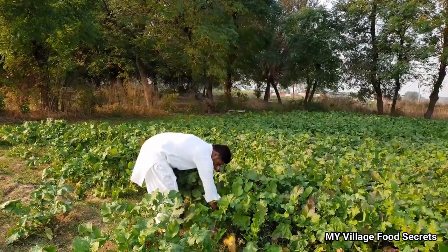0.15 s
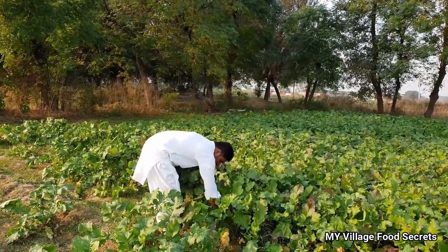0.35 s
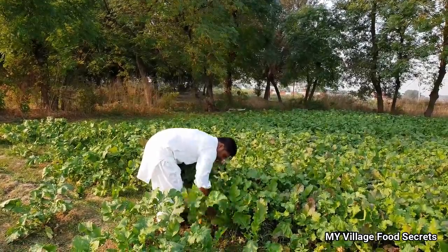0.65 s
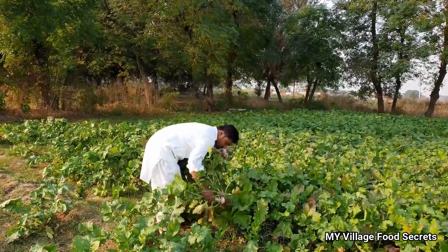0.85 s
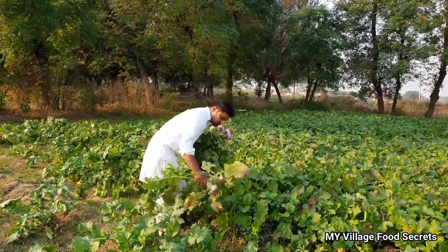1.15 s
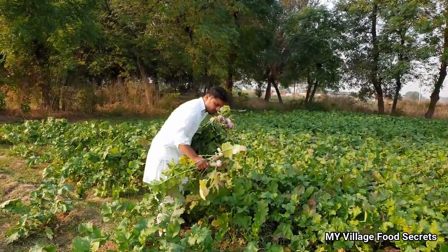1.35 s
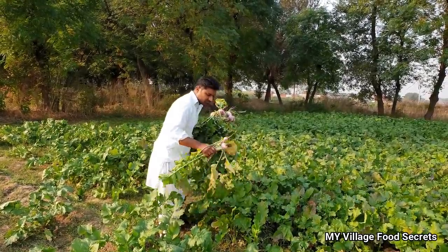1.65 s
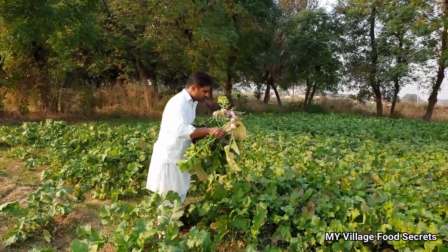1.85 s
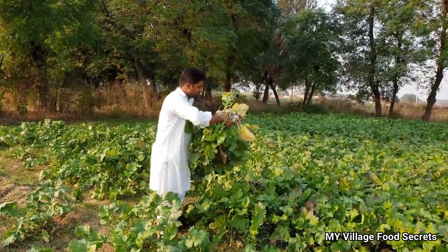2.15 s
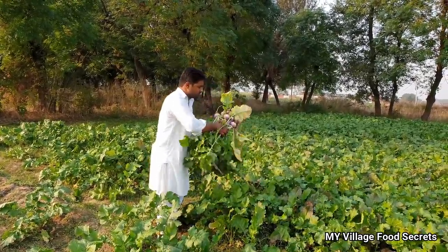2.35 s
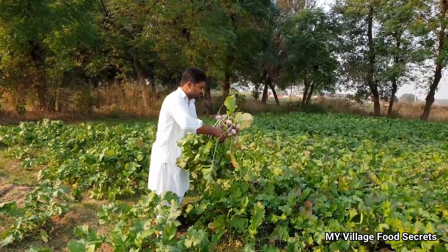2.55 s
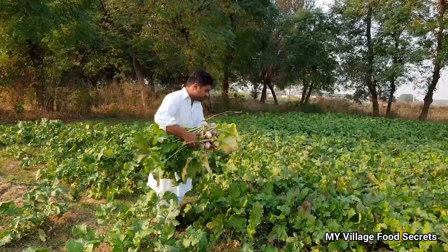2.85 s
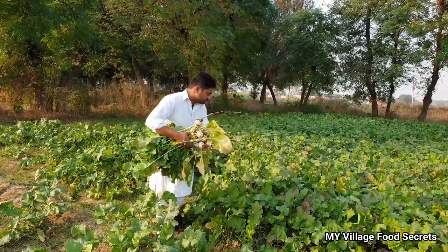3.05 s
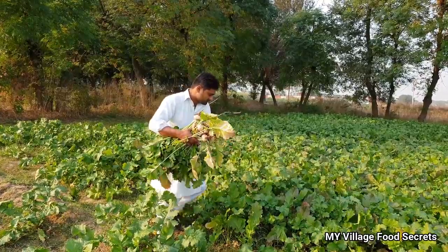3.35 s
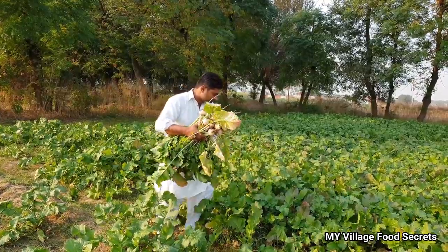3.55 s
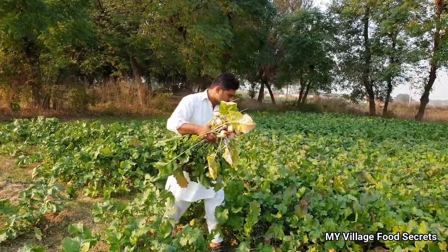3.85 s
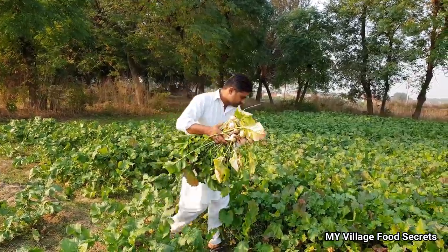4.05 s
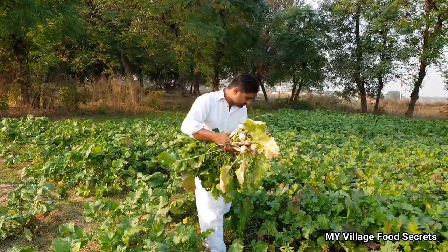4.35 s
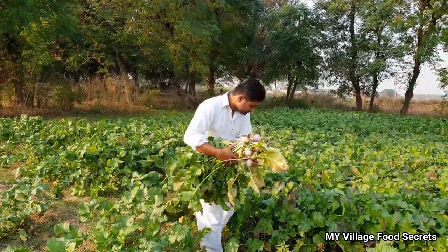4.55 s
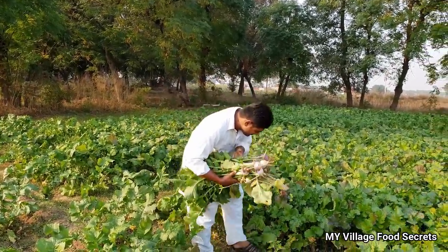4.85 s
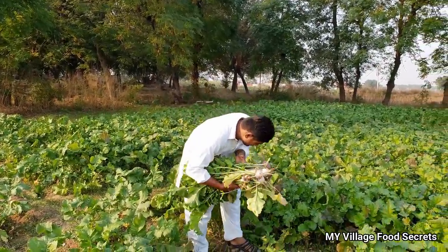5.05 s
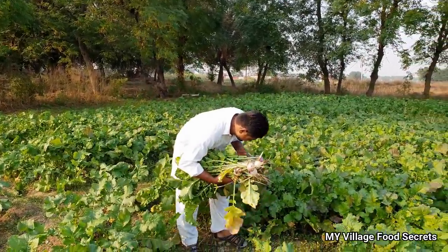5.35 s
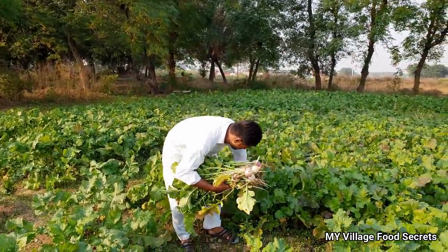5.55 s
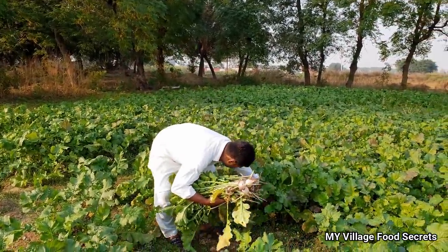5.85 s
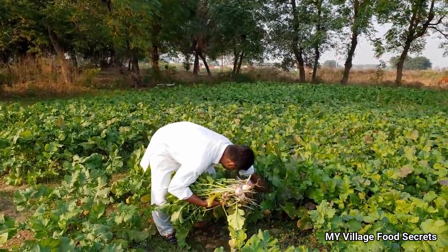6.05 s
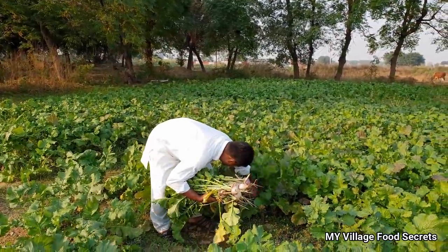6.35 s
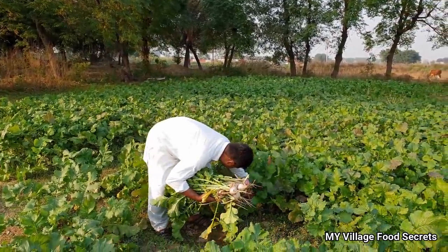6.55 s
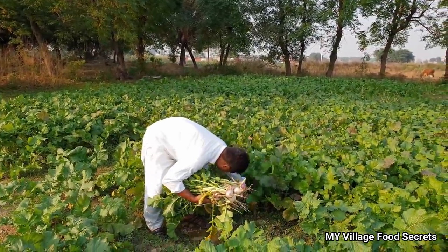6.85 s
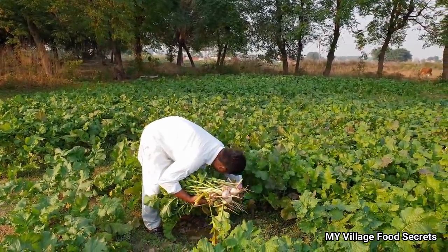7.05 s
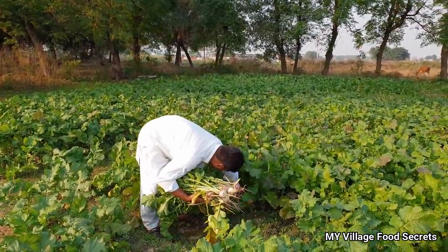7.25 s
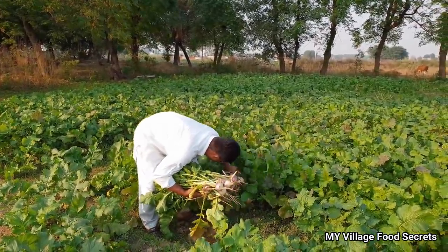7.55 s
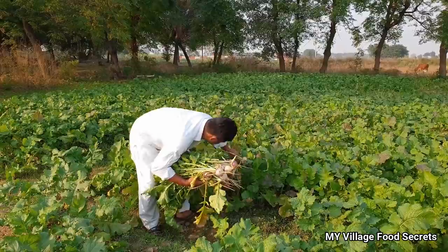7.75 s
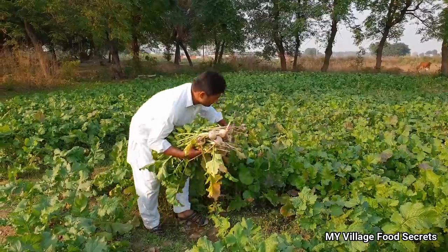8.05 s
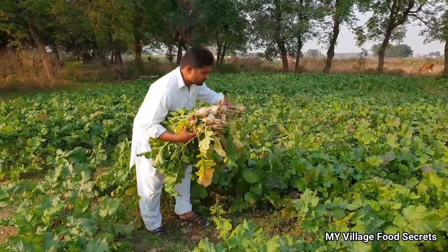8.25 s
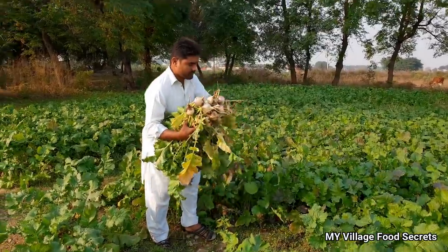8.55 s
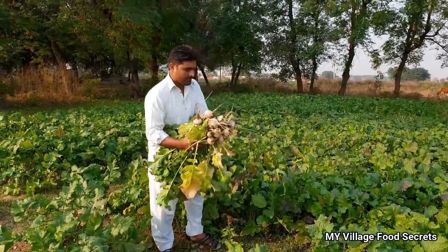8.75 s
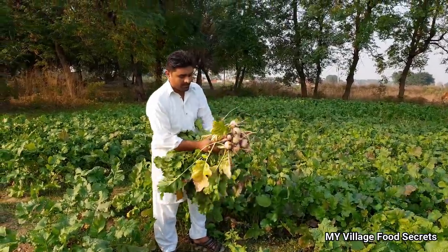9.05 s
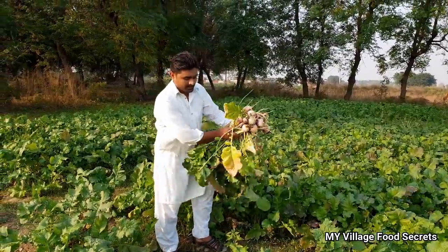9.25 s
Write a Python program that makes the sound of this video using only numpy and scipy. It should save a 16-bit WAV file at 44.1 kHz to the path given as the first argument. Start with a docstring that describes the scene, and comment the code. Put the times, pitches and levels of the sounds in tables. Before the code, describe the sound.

In an open field, wet leaves swish and crackle close by as turnips are pulled. A sharp stalk snap comes at 0.2 seconds, followed by strong rustling, short squeaks, more snaps and roots tearing from soil until about 1.3. Another pull comes around 2.2, then the handling softens. Rustling and snapping return from 4.3 to 5, from 6.8 to 8, and from 8.6 to the end at 9.4.

A small bird sings from 5.5 to 7 seconds: harsh chatter, a quick trill and four falling whistles, with a short echo from the trees.

Far away a diesel engine clatters, changing speed, then slows and fades after 7.5. A low pump hum wavers throughout, strongest at the start. A faint distant whine rises between about 2.5 and 3.7. Insects hiss faintly, and a light breeze adds a deep rumble on the microphones.

```python
"""Pulling turnips in a field

A man pulls turnips: wet leaves swish and crackle, stalks squeak and snap, roots tear out of the soil.
A small bird sings one phrase of chatter, a trill and falling whistles, echoed by the trees.
Far off a diesel engine clatters and changes speed, over the low hum of a pump and a brief whine.
Insects hiss faintly, and a light breeze presses on the microphones."""
import sys
import numpy as np
from scipy import signal
from scipy.fft import rfft, irfft, next_fast_len
from scipy.io import wavfile

SR = 44100
rng = np.random.default_rng(int(sys.argv[2]) if len(sys.argv) > 2 else 0)


def dump_mix(stems):
    """Bounce the given channels to the path in sys.argv[1] as a 16-bit WAV at rate SR."""
    frames = np.atleast_2d(stems).T  # one column per channel
    limited = np.clip(frames, -1, 1)  # hard clip at full scale
    pcm = np.round(limited * 32767).astype(np.int16)
    wavfile.write(sys.argv[1], SR, pcm)


N = 414981
T = np.arange(N) / SR
HZ = np.fft.rfftfreq(N, 1 / SR)

# Tone colours of the background noises: f/Hz, relative level/dB
RUMBLE_SPECTRUM = [(20, -39), (30, -35), (41, -4.5), (54, -2.5), (75, 4.5), (110, 0.5), (150, -0.5),
                   (185, -10.5), (235, -16), (350, -20.5), (520, -31), (1500, -55.5)]
AIR_SPECTRUM = [(200, -5.5), (380, -6), (550, -17), (850, 3), (1250, 4), (1700, 1.5), (3000, 0), (6500, -7),
                (8000, -10), (15800, -11)]
INSECT_SPECTRUM = [(3500, -30), (4500, -22), (5000, 0), (5700, 1), (6500, 1), (7100, -2.5), (7800, -29.5)]
WIND_SPECTRUM = [(22, -12), (40, 0), (60, 0.5)]
METAL_SPECTRUM = [(700, -28.5), (1400, -16), (1700, -5.5), (1900, -19), (2200, 0.5), (2450, -7), (2650, 1),
                  (3100, -32), (5000, -22)]
# How alike left and right are (1 same, 0 unrelated, -1 opposite): f/Hz, likeness
GROUND_LIKENESS = [(300, 0.83), (800, 0.53), (1200, -0.24), (2100, 0.6), (2900, 0.4), (3900, 0.24),
                   (6500, -0.0046), (15000, 0.056)]
RUMBLE_LIKENESS = [(100, 0.98), (400, 0.81)]
WIND_LIKENESS = [(20, 0.71), (60, 0.91)]
METAL_LIKENESS = [(1300, -0.78), (2150, 0.83), (2900, -0.43)]
# How the background sounds swell and fade: t/s, level/dB
RUMBLE_LEVEL = [(0, -39.5), (1.3, -39.5), (2.2, -44), (4, -45.5), (5.7, -46), (7.5, -44.5), (9.41, -45)]
INSECT_LEVEL = [(0, -51), (2, -55), (3.3, -55.5), (5.4, -56.5), (8.3, -55), (9.41, -52.5)]
CRICKET_LEVEL = [(0, -62), (2.6, -72), (3.1, -57), (3.6, -57), (4.6, -60), (5.5, -61), (7, -64),
                 (9.41, -70)]
WIND_LEVEL = [(0, -64), (1.8, -57), (2.3, -53), (3, -64), (4.6, -54), (5.7, -53), (6.5, -50), (7.2, -62),
              (8.3, -56), (9.41, -56)]
PUMP_LEVEL = [(0, -33.5), (0.7, -39.5), (1.15, -35), (1.5, -41.5), (2.9, -40.5), (3.6, -47), (4.35, -52),
              (4.65, -43.5), (5.4, -43), (6.3, -48), (6.7, -41.5), (7.2, -48), (8.4, -44.5), (9.41, -43.5)]
# Rise and fall of the whine: t/s, pitch as a share of its highest, relative level/dB
WHINE_PATH = [(2.3, 0.84, -40), (2.6, 0.79, 4), (2.9, 0.96, 4.5), (3.3, 0.98, 5.5), (3.7, 1, -10),
              (3.95, 0.8, -40), (4.2, .98, -80)]
# How fast the engine fires: t/s, f/Hz
ENGINE_SPEED = [(0, 45.6), (.55, 48), (.85, 44.6), (2.05, 38.8), (2.45, 40), (2.75, 41), (3.5, 36),
                (3.9, 35.7), (4.4, 35.7), (4.85, 40.3), (5.2, 42.5), (5.6, 45.5), (6.5, 44.8), (7.1, 45.7),
                (7.6, 39), (8.3, 35), (9.41, 20)]
# How hard the engine works: t/s, exhaust level/dB, clatter level/dB
ENGINE_LOAD = [(0, -43, -45.5), (.7, -41.5, -45), (1.2, -43.5, -45), (1.8, -41, -46.5), (2.1, -42, -48),
               (2.25, -45, -59), (2.5, -43, -56.5), (2.85, -39.5, -48.5), (3.45, -37.5, -48.5),
               (3.72, -51, -64), (3.95, -41.5, -54), (4.4, -41.5, -51), (5.2, -40, -54), (5.7, -42, -56),
               (6.7, -44.5, -55), (7.3, -44, -59.5), (8.2, -51.5, -90), (9.41, -66, -75)]
# Tones in the exhaust note: multiple of the firing rate, relative level/dB
EXHAUST_TONES = [(1, -15), (2, 2), (3, -3.5), (4, -11.5), (5, -30)]
# The bird's harsh opening chatter: t/s, level/dB
CHATTER_NOTES = [(5.561, -39.5), (5.594, -37.5), (5.615, -38.5), (5.637, -42)]
# Its falling calls: t/s, high note length/s, number of steps, low note length/s, high f/Hz, low f/Hz,
# level/dB of each of (high note, first step, last step, low note, rasp), roughness from 0 to 1
FALLING_CALLS = [(5.755, 0.048, 2, 0.055, 3490, 2380, -31.5, -23, -30, -31.5, -36.5, 0.03),
                 (6.277, 0.052, 2, 0.056, 3350, 2455, -24.5, -27, -29.5, -27.5, -39.5, 0.01),
                 (6.655, 0.036, 3, 0.045, 3342, 2102, -37, -32.5, -31.5, -37, -49, 0.44),
                 (6.935, 0.02, 0, 0.061, 3370, 2338, -29.5, -30, -30, -32.5, -38.5, 0.46)]
# Its short downward glides: t/s, length/s, start f/Hz, end f/Hz, level/dB
CHIP_NOTES = [(4.832, 0.037, 3320, 3220, -38), (6.857, 0.015, 3360, 2370, -33.5),
              (6.905, 0.01336, 6050, 5200, -26.5), (6.92, 0.016, 3930, 3520, -24)]
# Tone colours of rubbing leaves, their crisp edges and crumbling soil: f/Hz, relative level/dB
SWISH_SPECTRUM = [(700, -20.5), (1300, -12), (1800, -8.5), (3000, -3), (4500, 1.5), (6500, -2),
                  (7900, -17.5), (11000, -19)]
CRISP_SPECTRUM = [(5000, -10), (7500, -1.5), (10500, -1), (13500, -5.5), (15800, -10.5)]
SOIL_SPECTRUM = [(200, -21.5), (350, -2.5), (530, -9.5), (790, 0), (1250, -1.5), (1700, 3), (2800, -8),
                 (6000, -47)]
# Steady rustle, set by how hard the plants are handled: t/s, level/dB
RUSTLE_LEVEL = [(0, -44.5), (0.27, -46), (0.7, -41.5), (1.12, -44.5), (1.4, -51.5), (1.9, -52),
                (2.2, -47.5), (3.1, -50.5), (3.48, -59.5), (3.9, -56.5), (4.25, -47.5), (4.95, -42.5),
                (5.3, -54.5), (5.72, -52.5), (6.1, -45.5), (6.8, -54), (6.98, -43), (8.02, -44.5),
                (8.33, -59.5), (8.66, -47), (9.41, -46.5)]
# Armfuls of leaves brushing past each other: loudest t/s, length/s, level/dB, treble against level/dB
LEAF_STROKES = [(0.362, 0.07, -44.5, -8), (0.484, 0.06, -39.5, -4), (0.568, 0.066, -37, -3),
                (0.745, 0.14, -36.5, -7.5), (0.907, 0.075, -40.5, -4.5), (1.01, 0.046, -38, -1.5),
                (1.126, 0.058, -37.5, -7), (1.245, 0.1, -43, -4), (1.54, 0.081, -48, -6.5),
                (2.065, 0.058, -51.5, -3), (2.225, 0.09, -40.5, -5.5), (2.755, 0.22, -46, -6.5),
                (3.25, 0.14, -53, -5), (3.76, 0.21, -48, -5.5), (4.11, 0.17, -46.5, -4),
                (4.365, 0.1, -41, -5.5), (4.87, 0.19, -40.5, -8), (5.19, 0.039, -49.5, -4),
                (5.473, 0.19, -48, -8.5), (5.829, 0.12, -48, -10), (6.34, 0.084, -47, -9),
                (6.71, 0.1, -45.5, -11), (6.895, 0.072, -35.5, -8.5), (7.07, 0.13, -38, -8.5),
                (7.207, 0.095, -41, -3.5), (7.854, 0.2, -40.5, -7), (8.012, 0.14, -44.5, -6),
                (8.564, 0.078, -51.5, -1), (8.659, 0.11, -43, -2), (8.77, 0.065, -47, -1.5),
                (8.96, 0.1, -45, -3.5)]
# Roots tearing free: loudest t/s, length/s, level/dB
ROOT_TEARS = [(0.6, 1.9, -50.5), (2.0, 0.62, -56.5), (2.23, 0.07, -48), (4.5, 0.48, -56.5),
              (4.85, 0.14, -44), (6.0, 1.54, -57), (6.88, 0.041, -47), (8.664, 0.078, -44.5),
              (8.97, 0.35, -50)]
# Stalks sliding through the hand: t/s, length/s, f/Hz, level/dB
STALK_SQUEAKS = [(0.546, .05, 4730, -39), (.72, 0.066, 3900, -52), (.89, 0.062, 4400, -40),
                 (.985, 0.03, 4880, -34), (1.108, 0.044, 4500, -45), (1.512, 0.083, 5030, -46),
                 (2.209, .055, 4360, -46), (4.332, 0.07, 5200, -48)]
# Breaking stalks and roots: t/s, level/dB, low against middle/dB, top against middle/dB, ring f/Hz
STALK_SNAPS = [(0.1701, -16.5, -10.5, -12.5, 5400), (0.365, -36, -11, -24, 4210),
               (0.5176, -35, 1, -20, 4760), (0.8325, -28, -7.5, 0.5, 3730), (0.9914, -28.5, -21, -15, 5140),
               (1.4217, -36, -15, -32, 4640), (2.3323, -41.5, -4, -3, 6540),
               (4.3912, -32.5, -19, -17, 4920), (4.801, -21, 2, -15, 3120), (4.8137, -32, -4, -29, 3950),
               (4.8314, -30.5, 4.5, -26, 3283), (4.9184, -33.5, 0.5, -23, 5570),
               (5.004, -24.5, -12.5, -20, 6950), (6.8754, -21, -9, -16, 3500),
               (7.0065, -31, -17, -18, 3780), (7.1439, -29.5, -3.5, -14, 5700),
               (7.2, -23.5, -11, -12, 3780), (7.3966, -25, -11, -20, 4230), (8.623, -32.5, -4, -5, 4680),
               (8.6753, -33.5, -4, -14, 4220), (8.897, -35, 5.5, -22, 5980),
               (8.9501, -33.5, -17, -4.5, 5720), (8.982, -33.5, -13, -3, 4500),
               (9.3398, -22.5, -12, -7, 5360)]
# Tone colours of the low, middle and top parts of a snap: f/Hz, relative level/dB
SNAP_LOW_SPECTRUM = [(250, -28), (520, -17.5), (790, 4), (1000, 4.5), (1350, -3.5), (1700, 2), (2300, -2),
                     (3000, -3)]
SNAP_MID_SPECTRUM = [(1400, -9.5), (2400, 0.5), (3500, 2.5), (5300, 5), (6800, 4.5), (8200, -5.5)]
SNAP_TOP_SPECTRUM = [(6000, -42), (8000, -2), (11000, 8), (16000, 2)]
# How the two microphones differ: f/Hz, left minus right level/dB
MIC_BALANCE = [(100, 0), (1300, 0), (2400, -1.5), (4400, -3.5), (6500, -3), (8500, 5.5), (11000, 1.5),
               (15000, 7)]


def gain_of(db):
    """Turns decibels into a factor to multiply a sound by."""
    return 10 ** (np.asarray(db) / 20)


def evened(x):
    """Scales a sound to an average size (rms) of 1."""
    return x / np.sqrt(np.mean(x ** 2) + 1e-20)


def curves(rows):
    """Turns each column of a time table into one value per sample."""
    s, *columns = np.transpose(rows)
    return [np.interp(T, s, column) for column in columns]


def look_up(points, hz):
    """Reads between the rows of a frequency table, with octaves evenly spaced."""
    f, value = np.transpose(points)
    return np.interp(np.log(hz + 1), np.log(f + 1), value)


def colour(x, spectrum, likeness):
    """Gives a sound a tone colour and a left-right likeness, at an average size of 1."""
    size = 2 * next_fast_len(x.shape[-1] // 2 + 1024)
    hz = np.fft.rfftfreq(size, 1 / SR)
    edges = np.minimum(1, (hz + 1) / spectrum[0][0]) * np.minimum(1, spectrum[-1][0] / (hz + 1))
    log_gain = np.log(gain_of(look_up(spectrum, hz)) * edges ** 4 + 1e-5)  # steep fall outside the table
    # This filter rings only after a sound, never before it.
    response = np.exp(signal.hilbert(np.r_[log_gain, log_gain[-2:0:-1]]).conj()[:len(hz)])
    filtered = rfft(x, size) * response
    angle = np.arcsin(np.clip(look_up(likeness, hz), -1, 1)) / 2
    blended = np.cos(angle) * filtered + np.sin(angle) * filtered[::-1]
    return evened(irfft(blended, size)[..., :x.shape[-1]])


def drift(rate_hz, size=N):
    """A smooth random wobble of size about 1, no faster than the given rate."""
    knots = rng.standard_normal(int(size / SR * rate_hz * 2) + 4)
    fine = signal.resample_poly(knots, 8, 1)
    return np.interp(np.arange(size) / SR * rate_hz * 16, np.arange(len(fine)), fine)


def fuzz(hz, width_hz, size=N):
    """A band of noise around a pitch, different on each side."""
    wander = np.array([drift(width_hz / 2, size) + 1j * drift(width_hz / 2, size) for side in range(2)])
    return (wander * np.exp(2j * np.pi * np.cumsum(hz * np.ones(size)) / SR)).real


def sides(db):
    """Two gains that make the left side db louder than the right."""
    return evened(gain_of([[db / 2], [-db / 2]]))


def add(mix, s, sound):
    """Puts a sound into the mix, starting at s seconds."""
    part = mix[:, max(round(s * SR), 0):][:, :sound.shape[1]]
    part += sound[:, :part.shape[1]]


def field(air_db=-59.0):
    """Distant rumble, open air and a soft chorus of insects: three colours of noise."""
    rumble, air, insects = rng.standard_normal((3, 2, N))
    rumble_db = curves(RUMBLE_LEVEL)[0] + 1.03 * drift(rate_hz=3)
    insects_db = curves(INSECT_LEVEL)[0] + 2.5 * drift(rate_hz=16)
    return (colour(rumble, RUMBLE_SPECTRUM, RUMBLE_LIKENESS) * gain_of(rumble_db) * sides(db=1.0)
            + colour(air, AIR_SPECTRUM, GROUND_LIKENESS) * gain_of(air_db)
            + colour(insects, INSECT_SPECTRUM, GROUND_LIKENESS) * gain_of(insects_db))


def wind():
    """A light breeze presses on the microphones and makes a deep rumble."""
    push = colour(rng.standard_normal((2, N)), WIND_SPECTRUM, WIND_LIKENESS)
    return push * gain_of(curves(WIND_LEVEL)[0])


def cricket(hz=6480, width_hz=550):
    """One insect's thin buzz stands out of the chorus for a while."""
    return fuzz(hz, width_hz) * gain_of(curves(CRICKET_LEVEL)[0])


def whine(top_hz=1115, width_hz=115, db=-64.5):
    """A faint, fuzzy whine far away rises and holds, for about a second."""
    pitch, fade_db = curves(WHINE_PATH)
    return fuzz(top_hz * pitch, width_hz) * gain_of(db + fade_db)


def pump(start_hz=171.2, rise_hz=3.04, rise_at_s=7.7, waver_hz=1.0, neighbour_db=-16, flutter_db=1.7):
    """A hum at five times the shaft's turning rate and two weaker neighbours waver across the field."""
    hum_hz = start_hz + rise_hz * (1 + np.tanh(2 * (T - rise_at_s))) / 2
    hum = np.sin(2 * np.pi * np.cumsum(hum_hz + waver_hz * drift(rate_hz=6)) / SR)
    for ratio in (4 / 5, 6 / 5):
        neighbour_hz = hum_hz * ratio + 2.21 * drift(rate_hz=1.5)
        hum += gain_of(neighbour_db) * np.sin(2 * np.pi * np.cumsum(neighbour_hz) / SR)
    level_db = curves(PUMP_LEVEL)[0] + flutter_db * drift(rate_hz=7)
    return evened(hum) * gain_of(level_db) * sides(db=0.45)


def engine(uneven_db=2.7, knock_rise_s=0.002, steady_rattle=0.5, pip_hz=2270, pip_db=-3):
    """Every firing pushes the exhaust and strikes the engine's metal: a rounded pip in a short rattle."""
    firing_hz, = curves(ENGINE_SPEED)
    exhaust_db, clatter_db = curves(ENGINE_LOAD)
    firings = np.cumsum(firing_hz) / SR
    exhaust = np.zeros(N)
    for multiple, db in EXHAUST_TONES:
        gain = gain_of(db + 2.0 * drift(rate_hz=4.9))
        exhaust += gain * np.sin(2 * np.pi * (multiple * firings + rng.random()))
    since_s = firings % 1 / firing_hz
    # Each firing gets its own strength and pitch.
    strength, detune = np.clip(rng.standard_normal((600, 2)), -1.6, 1.3)[firings.astype(int)].T
    rise = since_s / knock_rise_s
    knock = gain_of(uneven_db * strength) * rise * np.exp(1 - rise)
    rattle = colour((knock + steady_rattle) * rng.standard_normal((2, N)), METAL_SPECTRUM, METAL_LIKENESS)
    pips = evened(knock * np.sin(2 * np.pi * pip_hz * (1 + 0.052 * detune) * since_s))
    clatter = evened(rattle + gain_of(pip_db) * pips) * gain_of(clatter_db)
    return evened(exhaust) * gain_of(exhaust_db - 1.5) * sides(db=0.98) + clatter


def note(s, length, hz, db, start=1, end=1, rough=0, overtone_db=-16):
    """Describes one bird note; start and end are multiples of its middle pitch."""
    return s, length, hz * start, hz, hz * end, db, rough, overtone_db


def chatter(flick_hz=3720, buzz_hz=2600, buzz_db=-1.5):
    """The bird uses two voices at once: a quick downward flick over a harsh buzz."""
    for s, db in CHATTER_NOTES:
        yield note(s, 0.014, flick_hz, db, start=1.14, end=0.857, rough=0.3, overtone_db=-27)
        yield note(s + 0.0044, 0.0226, buzz_hz, db + buzz_db, rough=0.723, overtone_db=-10)


def trill(start_s=6.068, every_s=0.03, count=4, base_hz=2850, first_db=-34, louder_db=1.6):
    """Arched notes grow longer and louder and droop more; a lower voice slides down between them."""
    for k in range(count):
        s, length = start_s + k * every_s, 0.018 + k * 0.0064
        scoop = 0.8 if k == 0 else 0.96 + 0.02 * k
        hz = base_hz * (0.95 if k == 0 else 1 - 0.004 * k)
        yield note(s, length, hz, first_db + k * louder_db, start=scoop, end=1 - 1.9 * length, rough=0.05)
        if k < count - 1:
            yield note(s + 0.014, 0.012, hz=2350, db=-39, start=1.17, end=0.9, rough=0.27, overtone_db=-6)


def falling_calls(first_drop=0.1398, step_drop=0.378, step_s=0.016, break_s=0.0039):
    """A high whistle breaks, drops (mostly in steps), holds a low note, catches and ends in a rasp."""
    for (s, high_s, steps, low_s, high_hz, low_hz,
         high_db, first_db, last_db, low_db, rasp_db, rough) in FALLING_CALLS:
        over_db, slide = -17.5 + 14 * rough, 0.147 * rough  # rough calls are brighter and slide more
        yield note(s, high_s - break_s, high_hz, high_db, start=0.985 + slide, end=0.97 - slide,
                   rough=rough, overtone_db=over_db)
        s += high_s
        for k, db in enumerate(np.linspace(first_db, last_db, steps)):  # a flick, then the step itself
            hz = high_hz + (low_hz - high_hz) * (first_drop + k * step_drop)
            yield note(s - 0.002, 0.0059, hz=3850, db=-38, start=1.22, end=0.85,
                       rough=0.25, overtone_db=-18)
            yield note(s, 0.011, hz, db, start=1.04, end=0.985, rough=rough / 2, overtone_db=over_db)
            s += step_s
        yield note(s, low_s - break_s, low_hz, low_db, start=1.015, end=0.95,
                   rough=rough / 2, overtone_db=over_db - 11)
        s += low_s  # the catch, then the rasp
        yield note(s, 0.008, low_hz * 0.95, rasp_db + 3, start=1.04, end=0.96, overtone_db=-25)
        yield note(s + 0.005, 0.036, low_hz * 0.8, rasp_db, start=1.3, end=0.9,
                   rough=0.43, overtone_db=-21)


def chips():
    """Short downward glides: two stand alone, two plunge into the last falling call."""
    for s, length, start_hz, end_hz, db in CHIP_NOTES:
        hz = np.sqrt(start_hz * end_hz)
        yield note(s, length, hz, db, start=start_hz / hz, end=end_hz / hz, rough=0.08, overtone_db=-15)


def bird(flutter_db=2.0, third_db=-15, fourth_db=-16):
    """Each note is a gliding whistle with overtones; rough ones shake in pitch and level."""
    out = np.zeros((2, N))
    notes = [*chatter(), *trill(), *falling_calls(), *chips()]
    for s, length, start_hz, mid_hz, end_hz, db, rough, overtone_db in notes:
        size = int((length + 0.0036) * SR)
        progress = np.linspace(0, 1, size)
        hz = np.polyval(np.polyfit([0, .5, 1], [start_hz, mid_hz, end_hz], 2), progress)
        hz *= 1 + (0.0046 + 0.17 * rough) * drift(rate_hz=500, size=size)
        lead = 4.0 * np.log2(min(mid_hz, 3700) / 2900)  # radians by which the left side leads
        phase = 2 * np.pi * np.cumsum(hz) / SR + np.array([[lead], [0]])
        overtones = (np.sin(2 * phase) + gain_of(third_db) * np.sin(3 * phase)
                     + gain_of(fourth_db) * np.sin(4 * phase))
        tone = np.sin(phase) + gain_of(overtone_db) * overtones
        shake_db = flutter_db * drift(rate_hz=46, size=size) + 7 * rough * drift(rate_hz=225, size=size)
        swell = np.minimum(1, progress / 0.16) * np.minimum(1, (1 - progress) / 0.18) * gain_of(shake_db)
        pan_db = 2.1 + 7 * np.log2(min(mid_hz, 3400) / 2650)  # the ground echo favours a side by pitch
        add(out, s, evened(tone * swell) * gain_of(db) * sides(pan_db))
    return out


def tree_echo(song, fade_s=0.37, delay_s=0.0043, db=-7.0):
    """The edge of the wood sends back a thin tail of scattered echoes."""
    t = np.arange(SR) / SR
    echoes = rng.standard_normal((2, SR)) * (rng.random((2, SR)) < .04)
    echoes *= gain_of(-60 * t / fade_s) * (t > delay_s)
    return gain_of(db) * signal.fftconvolve(song, echoes / np.linalg.norm(echoes[0]), axes=1)[:, :N]


def squeaks(width_hz=1000):
    """Wet stalks stick and slide in the hand: short hissy squeaks."""
    out = np.zeros((2, N))
    for s, length, hz, db in STALK_SQUEAKS:
        size = int(length * SR)
        add(out, s, fuzz(hz, width_hz, size) * signal.windows.tukey(size, .8) * gain_of(db))
    return out


def ring(x, hz, db=5):
    """The stalk rings briefly at one pitch."""
    return x + gain_of(db) * signal.lfilter(*signal.iirpeak(hz, 4, SR), x)


def snaps(crack_s=0.001, scatter_s=0.0089, scatter_db=-14, knock_hz=2240, trim_db=-11):
    """A stalk breaks with a bright ring and a woody knock; the ground and leaves scatter the crack."""
    out, t = np.zeros((2, N)), np.arange(2048) / SR
    fade = np.exp(-t / crack_s) + gain_of(scatter_db) * np.exp(-t / scatter_s)
    for s, db, low_db, top_db, ring_hz in STALK_SNAPS:
        burst = rng.standard_normal((2, len(t))) * fade
        burst = ring(ring(burst, ring_hz), knock_hz)
        crack = (colour(burst, SNAP_LOW_SPECTRUM, GROUND_LIKENESS) * gain_of(low_db)
                 + colour(burst, SNAP_MID_SPECTRUM, GROUND_LIKENESS)
                 + colour(burst, SNAP_TOP_SPECTRUM, GROUND_LIKENESS) * gain_of(top_db))
        add(out, s, crack * gain_of(db + trim_db) * sides(db=1.5))
    return out


def stem_ticks(per_s=45, tick_s=0.0009, spread_db=3.0, db=-10.5):
    """Small stems crack now and then, each a millisecond of noise."""
    sizes = gain_of(spread_db * np.minimum(rng.exponential(1, N), 2.2)) * (rng.random(N) < per_s / SR)
    fades = signal.lfilter([1], [1, -np.exp(-1 / (tick_s * SR))], sizes)
    return evened(fades * rng.standard_normal((2, N))) * gain_of(db)


def crackle(per_s, spread_db, grain_s, smooth):
    """Tiny slips of uneven size, each a short burst, over smooth rubbing noise."""
    sizes = gain_of(spread_db * np.minimum(rng.exponential(1, N), 4)) * (rng.random(N) < per_s / SR)
    power = signal.lfilter([1], [1, -np.exp(-2 / (grain_s * SR))], sizes ** 2)
    return evened(np.sqrt(power / power.mean() + smooth) * rng.standard_normal((2, N)))


def stroke(peak_s, length, db):
    """The power of one movement swells and dies away; length is that of its loud part."""
    from_peak = (T - peak_s) / (length / 2)
    return np.exp(-np.minimum(from_peak ** 2, 20)) * gain_of(db) ** 2


def leaves_and_soil(usual_db=-44.5, usual_soil_db=-54.8, clump_db=1.5):
    """Leaves slide over each other in clumps of slips; beneath them soil crumbles and roots tear free."""
    rustle_db, = curves(RUSTLE_LEVEL)
    swish_power = gain_of(rustle_db) ** 2
    crisp_power = swish_power * gain_of(-6 + 0.3 * (rustle_db - usual_db)) ** 2  # brighter with effort
    for s, length, db, crisp_db in LEAF_STROKES:
        power = stroke(s, length, db)
        swish_power += power
        crisp_power += power * gain_of(crisp_db) ** 2
    # The soil crumbles along with the rustle, but its level changes less.
    soil_power = gain_of(usual_soil_db + 0.58 * (10 * np.log10(swish_power) - usual_db)) ** 2
    soil_power += sum(stroke(s, length, db) for s, length, db in ROOT_TEARS)
    clumps = gain_of(clump_db * drift(rate_hz=22))
    slips = crackle(per_s=500, spread_db=2.0, grain_s=0.0034, smooth=1.0) + stem_ticks()
    crumbs = crackle(per_s=260, spread_db=5.4, grain_s=0.008, smooth=1.4)
    swish = colour(slips, SWISH_SPECTRUM, GROUND_LIKENESS) * np.sqrt(swish_power)
    crisp = colour(slips, CRISP_SPECTRUM, GROUND_LIKENESS) * np.sqrt(crisp_power)
    soil = colour(crumbs, SOIL_SPECTRUM, GROUND_LIKENESS) * np.sqrt(soil_power)
    return (swish + crisp + soil) * clumps


def scene():
    """Plants close by, the bird in front of the trees, machines in the distance."""
    song = bird()
    plants = leaves_and_soil() + snaps() + squeaks()
    return plants + song + tree_echo(song) + engine() + pump() + whine() + cricket() + wind() + field()


def record(dry, top_hz=15900):
    """Two microphones colour the sound a little differently; the highest treble is cut off."""
    balance = gain_of(look_up(MIC_BALANCE, HZ) * np.array([[.5], [-.5]]))
    heard = irfft(rfft(dry) * balance, N)
    treble_cut = signal.firwin(401, top_hz, window=("kaiser", 8), fs=SR)
    return signal.oaconvolve(heard, treble_cut[None], "same", axes=1)


dry = scene()
out = record(dry)
dump_mix(out)
```